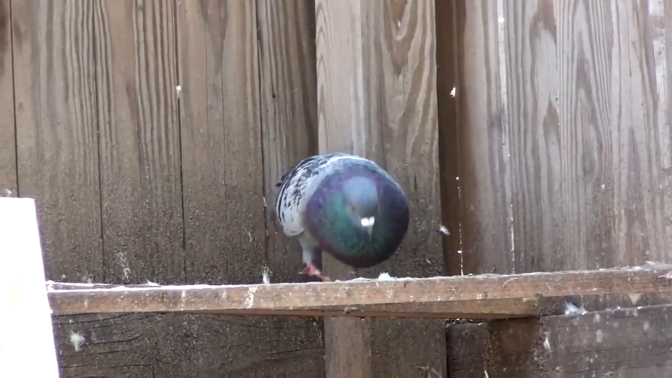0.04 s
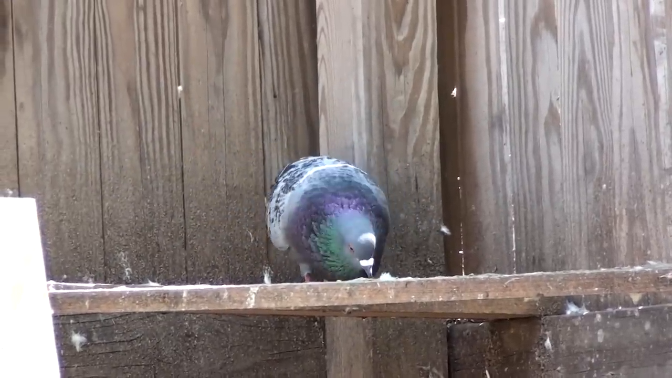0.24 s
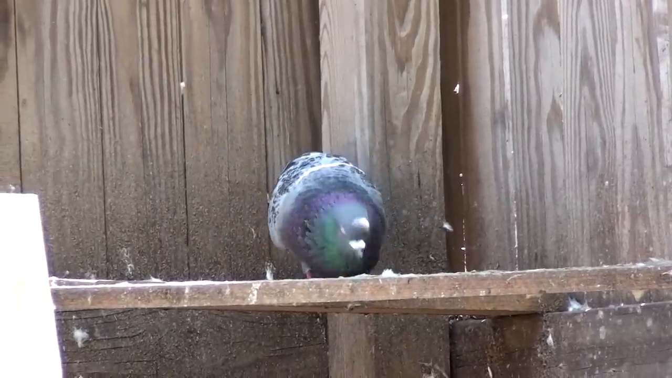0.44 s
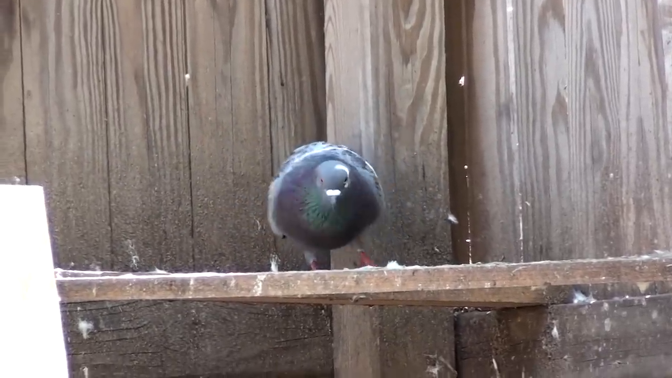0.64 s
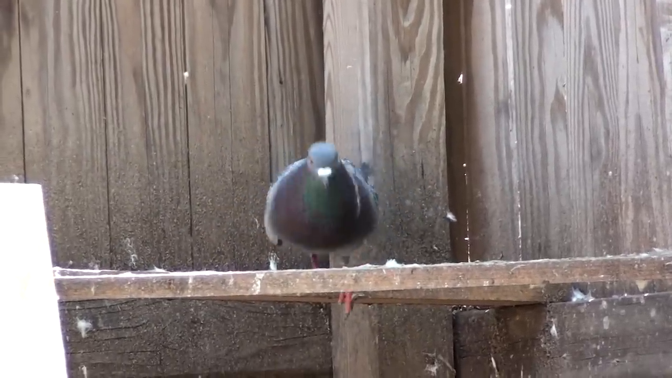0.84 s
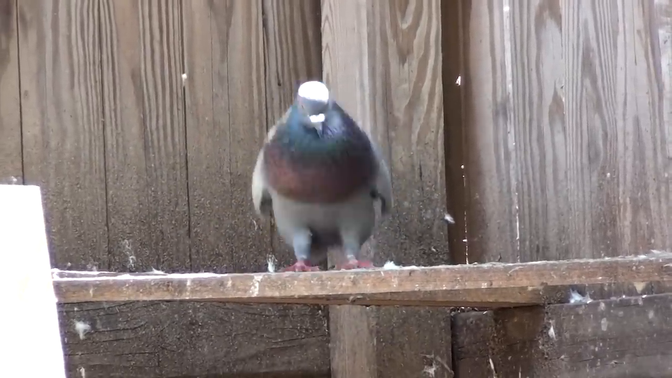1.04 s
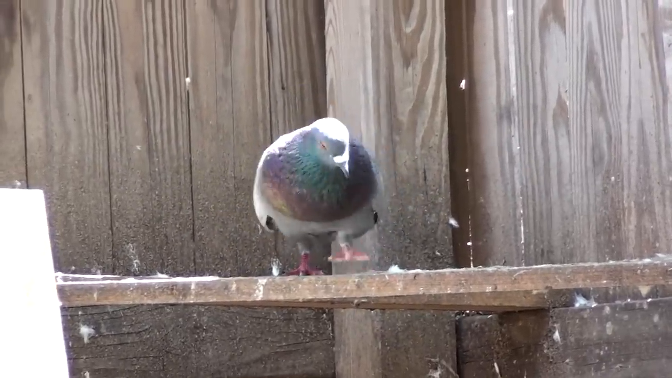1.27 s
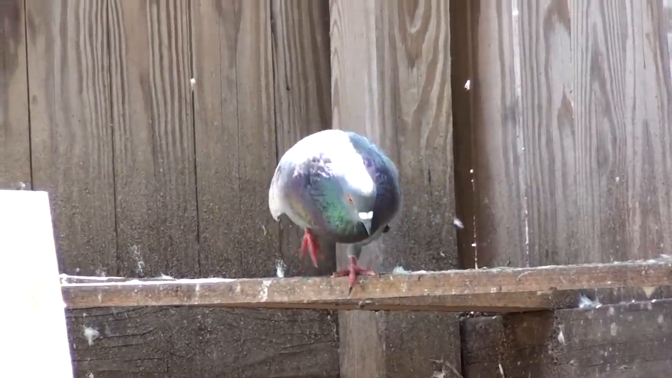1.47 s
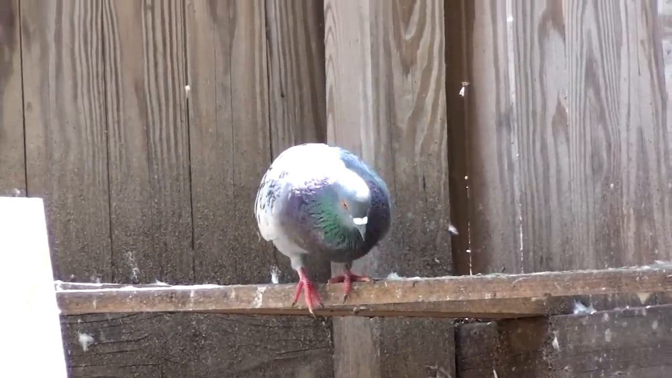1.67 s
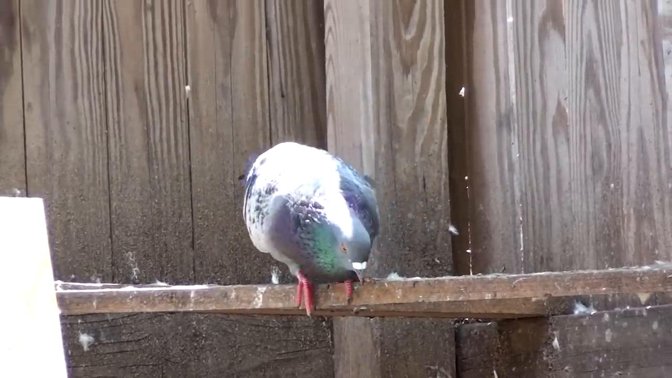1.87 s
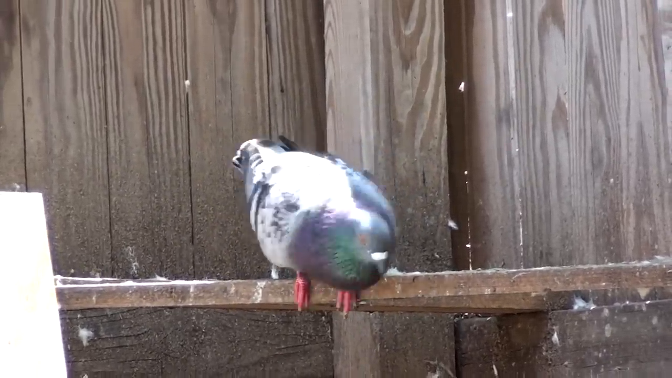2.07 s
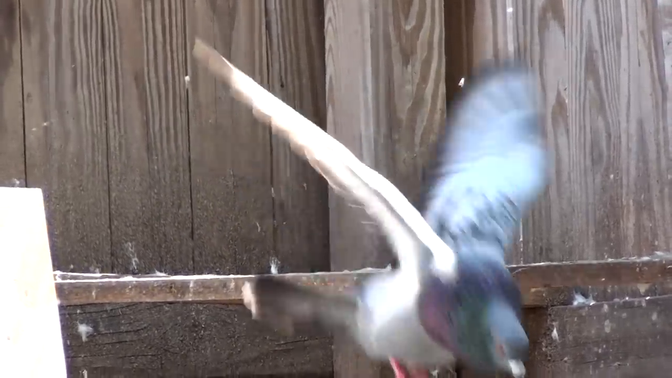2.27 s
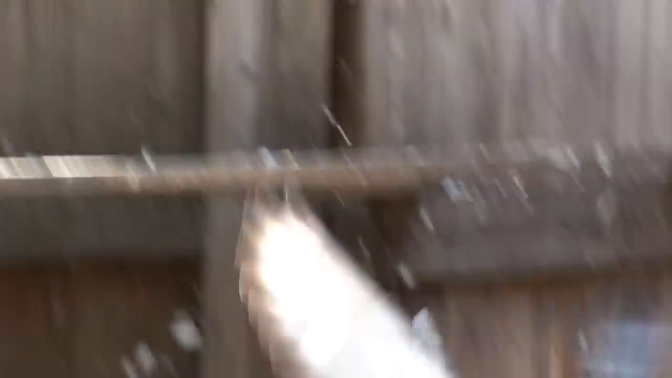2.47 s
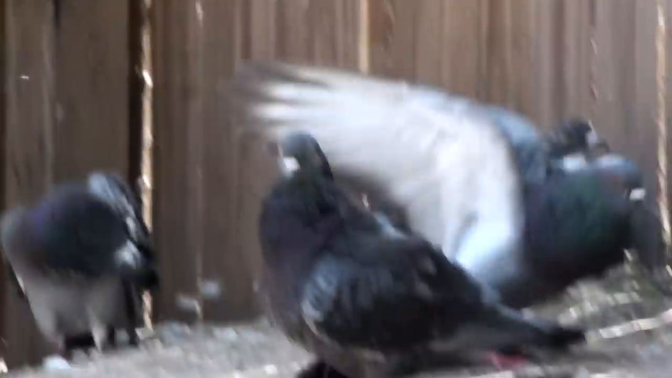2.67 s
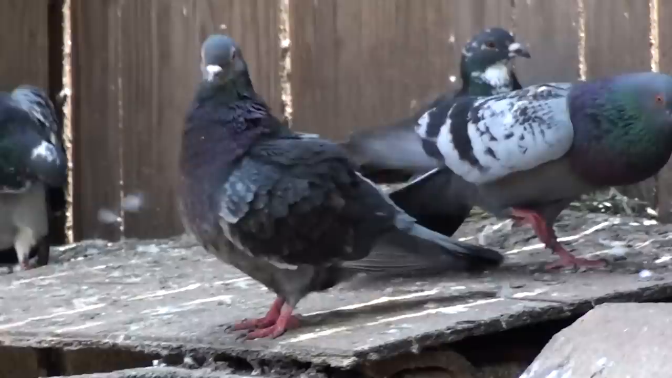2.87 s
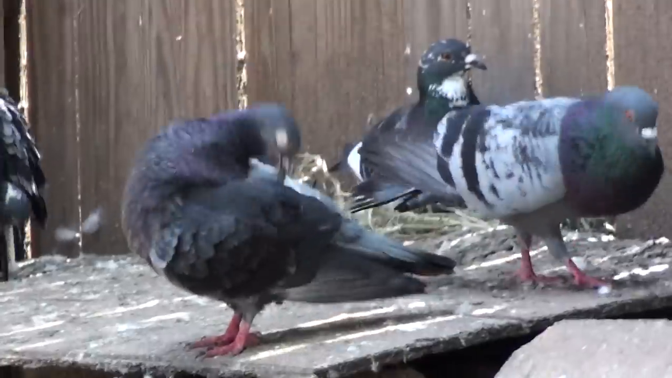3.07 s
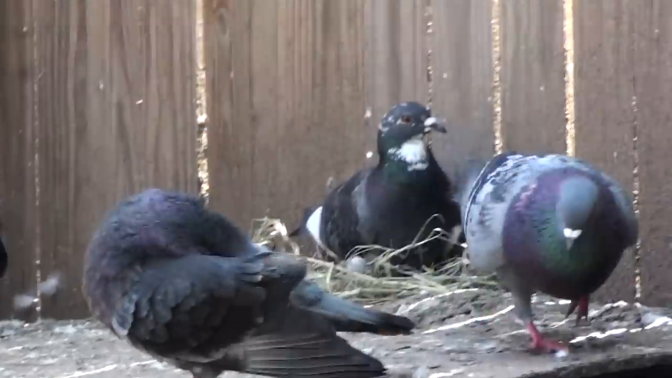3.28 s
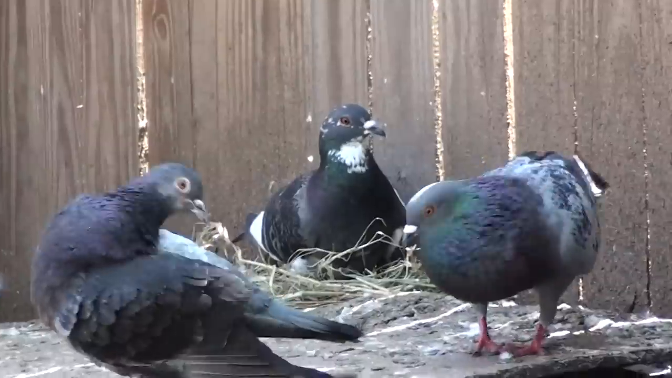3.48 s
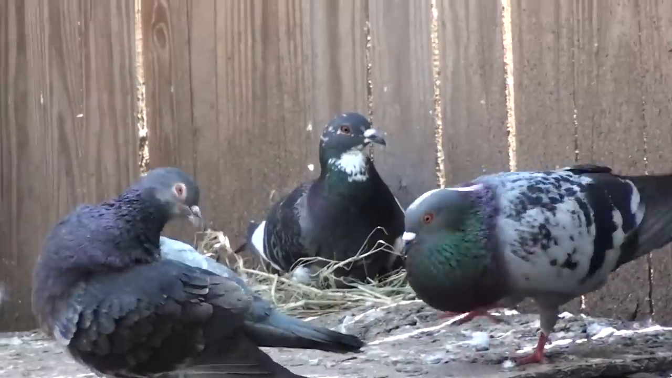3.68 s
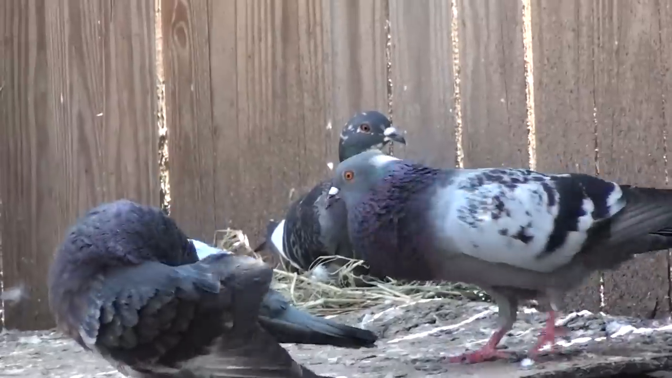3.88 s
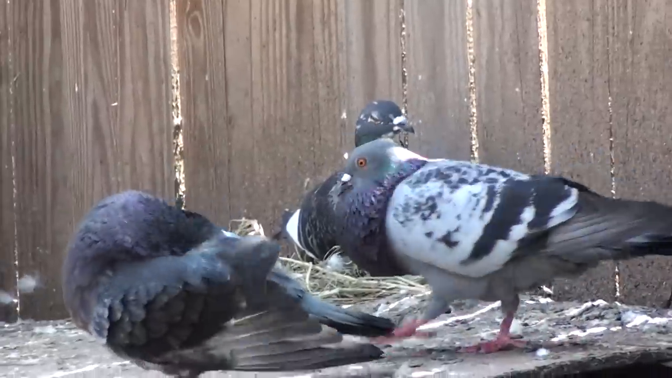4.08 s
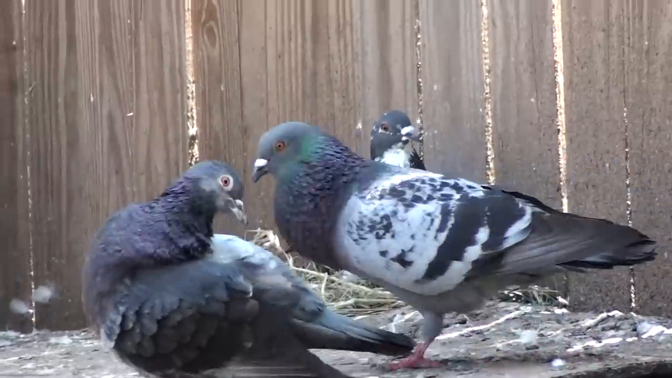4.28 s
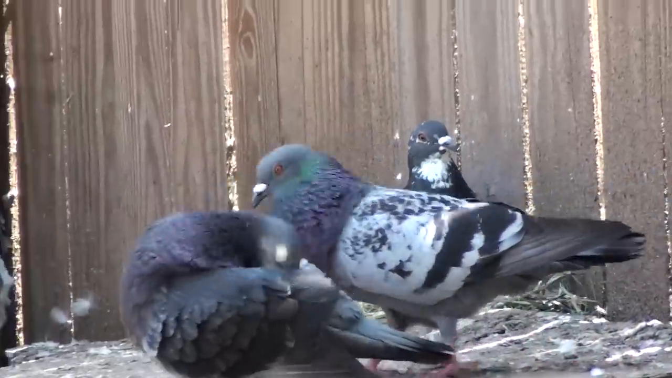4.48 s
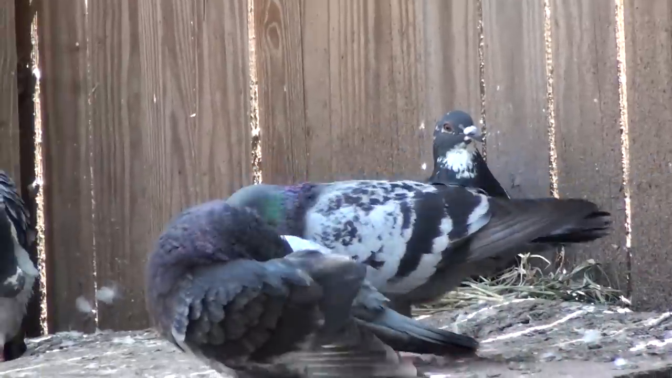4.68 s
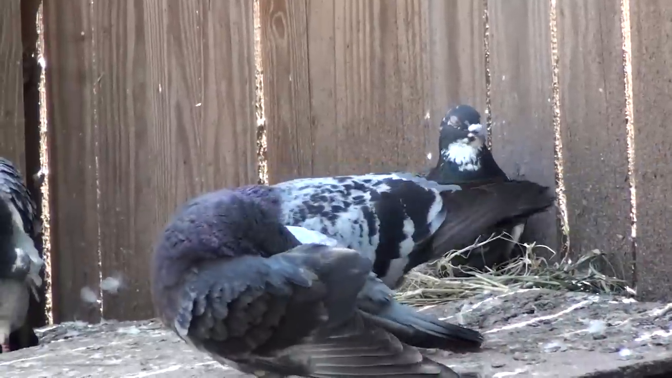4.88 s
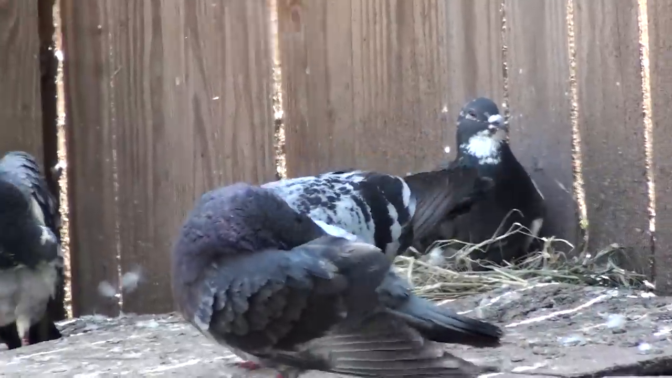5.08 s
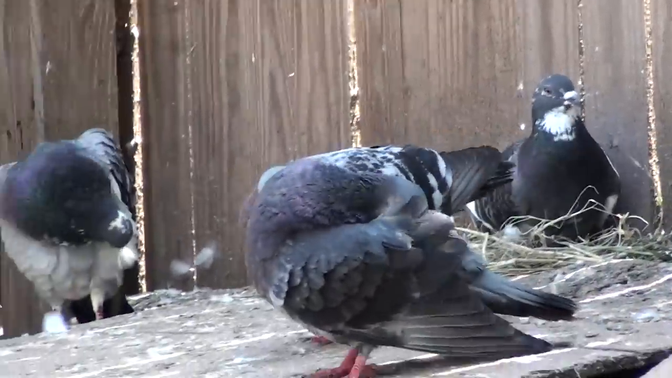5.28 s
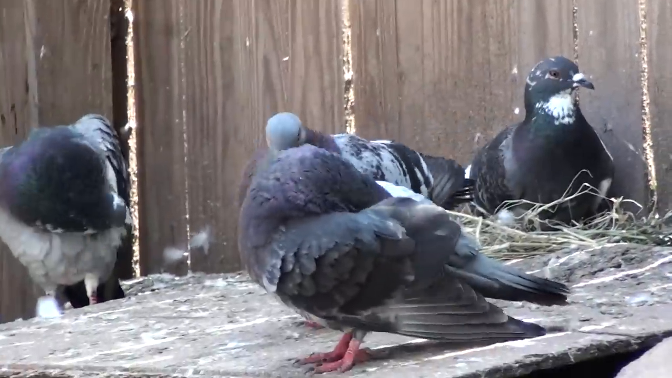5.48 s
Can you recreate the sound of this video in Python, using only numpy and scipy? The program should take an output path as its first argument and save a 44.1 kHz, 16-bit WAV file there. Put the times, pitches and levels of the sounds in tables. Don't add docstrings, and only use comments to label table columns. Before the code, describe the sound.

Two long hollow coos from one pigeon open the scene, each closing in a little gulp, with other birds murmuring behind. A tiny claw click and dry feather rustle lead to two quick wing claps. Then the cooing turns broken, lower and quieter, with several throats gurgling together. Handheld stereo pickup in a small wooden enclosure outdoors, with low yard rumble, soft hiss and thin motor whine.

```python
import sys
import numpy as np
from scipy import signal
from scipy.fft import rfft, irfft
from scipy.io import wavfile
from scipy.ndimage import uniform_filter1d

SR = 44100
rng = np.random.default_rng(int(sys.argv[2]) if len(sys.argv) > 2 else 0)


def voltage_ratio(decibels):
    exponent = np.asarray(decibels, float) / 20
    return 10 ** exponent


def put_to_file(sound):
    columns = np.atleast_2d(sound).T
    safe = np.clip(columns, -1, 1)
    whole_steps = np.round(safe * 32767)
    wavfile.write(sys.argv[1], SR, whole_steps.astype(np.int16))


N = 243873
T = np.arange(N) / SR


def walk(rate):
    hold = int(SR / rate)
    steps = np.repeat(rng.standard_normal(N // hold + 1), hold)
    return np.sqrt(2) * uniform_filter1d(uniform_filter1d(steps, hold), hold)[:N]


def hump(t, middle, length):
    return np.cos(np.pi * np.clip((t - middle) / length, -.5, .5)) ** 2


def swells(table):
    return sum(change * hump(T, middle, length) for middle, change, length in table)


def band(x, hz, width_hz):
    peak = signal.iirpeak(hz, max(hz / width_hz, .3), SR)
    return signal.lfilter(*peak, signal.lfilter(*peak, x))


# f/Hz, density level/dB per Hz
YARD = [(15, -36), (25, -8), (110, 3), (199, -4.5), (268, -8.5), (314, -8), (370, -11.5), (554, -13),
        (600, -12.5), (668, -14), (725, -13.5), (1210, -18.5), (3750, -29.5), (11900, -37), (15600, -38.5)]
# f/Hz, side minus mid level/dB
YARD_SIDE = [(25, -6.5), (60, -11), (125, -15), (250, -17), (400, -12), (700, -6), (1300, -2.5), (2400, -3),
             (4400, -3.5), (8000, -6.5), (11000, -8)]
# middle t/s, level/dB, length/s
RUMBLE = [(.01, -5, 0.31), (.3, -3.5, 0.38), (.58, 4, 0.05), (1.5, 2.5, 0.18), (3.73, -5, .06),
          (5.11, -3, .08), (4.52, 0.5, 0.093), (1.99, 3.5, 0.33), (2.58, -5.5, 0.13), (3.29, 3, 0.1),
          (3.325, -8, 0.04), (3.42, 5, 0.059), (3.47, -9, 0.08), (3.75, -1, 0.08), (4.34, -5, 0.1),
          (4.45, 3.5, .15), (5.45, 1.5, .1), (4.65, 1.5, 0.85), (5.11, 3, 0.21), (5.35, -2, 0.16),
          (5.52, -6, 0.11)]
# middle t/s, level/dB, length/s
PASSES = [
    (0.81, 1.5, 0.44),
    (1.96, 0.5, 1),
    (2.64, 2.5, 0.48),
    (3.57, 1, 0.24),
    (1.43, -2, 0.61),
    (1.02, -0.5, .3),
]
PASS_BASS = 0.28


def yard(level_db=-50, flicker_db=1.15, rumble_hz=170, hiss_hz=3000):
    log_hz = np.log(np.maximum(np.fft.rfftfreq(N, 1 / SR), 1))
    yard_hz, yard_db = np.transpose(YARD)
    side_hz, side_db = np.transpose(YARD_SIDE)
    mid = rfft(rng.standard_normal(N)) * voltage_ratio(np.interp(log_hz, np.log(yard_hz), yard_db, left=-90))
    random_phase = np.exp(2j * np.pi * rng.random(len(log_hz)))
    side = np.abs(mid) * random_phase * voltage_ratio(np.interp(log_hz, np.log(side_hz), side_db))
    air_db = swells(PASSES)
    rumble_db = swells(RUMBLE) + PASS_BASS * air_db
    out, step = 0, np.log(2) / 2
    for centre in np.arange(np.log(16), np.log(SR / 2), step):
        share = np.clip(1 - np.abs(log_hz - centre) / step, 0, 1)
        hz = np.exp(centre)
        bass = 1 / (1 + (hz / rumble_hz) ** 4)
        db = bass * (rumble_db - rumble_db.mean())
        db += flicker_db * walk(8) / (1 + hz / hiss_hz)
        db += (1 - bass) / (1 + (hz / hiss_hz) ** 2) * (air_db - air_db.mean())
        out = out + voltage_ratio(db) * irfft(share * np.array([mid + side, mid - side]), N)
    return out * voltage_ratio(level_db) / out.mean(axis=0).std()


# f/Hz, level/dB rms
WHINE = [
    (841, -72),
    (2526, -82),
]


def whine(patchy_db=3.5):
    ports = np.array([[.55], [-.55]])
    out = 0
    for hz, db in WHINE:
        out = out + np.sqrt(2) * voltage_ratio(db + patchy_db * walk(12)) * np.sin(2 * np.pi * hz * T + ports)
    return out


# middle t/s, change/%, length/s
WAVERS = [(.13, -3, .03), (.165, 3, .04), (.21, -2, .03), (.26, 1.5, .06), (.36, -3, .06), (.45, -1, .06),
          (.59, -1, .03), (.63, 2.5, 0.061), (.69, 1.5, .03), (.73, -2, .025), (1.64, 6, .09),
          (1.84, 1.8, 0.076), (1.94, 1.5, .025), (1.98, -1.78, 0.073), (2.04, 1.5, 0.056),
          (2.13, -1.5, .07), (2.2, 3, .025), (3.19, 3, .04), (3.23, 4, .03), (3.25, -2, .025),
          (3.31, 5, 0.029), (3.37, 2, .025), (3.43, 2, .03), (3.87, -1.5, .03), (3.94, -1.5, .04),
          (4.02, -3.5, .06), (4.85, 3, .03), (4.89, -5, .03), (4.93, -2, .025)]
# pitch f/Hz, octave level/dB
OCTAVE = [(135, -49.5), (165, -46.5), (192, -45.5), (235, -50), (300, -53.5), (350, -69)]
# middle t/s, level/dB, length/s
CATCHES = [(.145, 3, .03), (0.172, -4, 0.03), (3.6, -1, 0.021), (1.7, 2, 0.036), (.282, -4.5, 0.061),
           (0.318, 0, 0.031), (.498, -2.5, 0.049), (0.66, -3, 0.011), (.635, 1, .04), (.74, -3, 0.019),
           (1.815, -3.5, 0.037), (1.85, 1.5, 0.034), (2.142, -4, 0.057), (2.184, -8, .018),
           (3.3, -5, 0.018), (3.365, 0.5, 0.021), (3.378, -3, .015), (3.455, -2, 0.025), (3.484, -4, .01),
           (.35, -2, .04), (.52, 1, .04), (.19, -2, .025), (1.74, -1, .025), (1.76, 1, .025),
           (3.21, 0, .025), (3.87, 2, .025), (4.77, 3, .03), (3.477, 0.5, 0.028), (3.564, 1.5, 0.013),
           (3.843, 5.5, 0.027), (4.015, -3, 0.036), (4.095, 0, .03), (4.128, -3, 0.018)]
OCTAVE_CATCH = 0.98
# middle t/s, level/dB, length/s
BREAKS = [(0.148, -5.5, 0.042), (.71, 1.5, .05), (2.12, -4, .05), (2.15, 5, .04), (3.94, -1, 0.053),
          (.176, -8, 0.019), (0.079, -8, .03), (1.545, -8, 0.033), (1.565, 3, .04), (1.595, -6, 0.019),
          (1.645, -9, .035), (1.7, -3, .06), (1.97, -2, .08), (2.05, 2, .06), (3.83, 8, .04),
          (3.59, 3, .04), (5.455, 9, .04), (5.49, -8, .04), (4.5, 0.5, .06), (4.56, 1, 0.054),
          (.77, -8, .04), (4.88, -6, .05), (.115, 1, 0.051), (.505, -5, .03), (.632, -14, 0.034),
          (.74, -4, 0.063), (2.18, 0, 0.021), (3.12, -3, 0.057), (3.292, -15, 0.03), (3.32, 6.5, 0.06),
          (3.365, 2, .03), (1.8, -1, .05), (.35, -2, .05), (4.82, 1, .05), (3.085, -7, .06),
          (3.17, 3.5, .05), (5.51, -4, .03), (3.39, -8, .025), (4.12, -8, 0.14), (4.785, -6, .04),
          (4.84, 4.5, 0.051), (4.67, 0.5, 0.09)]
# from t/s, to t/s, level/dB
DOUBLING = [
    (0.223, 0.395, -50.5),
    (0.476, 0.598, -53),
    (0.602, .665, -50.5),
    (1.724, 1.91, -50),
]


def coo(track, lead, shimmer_db, octave_gain_db, wobble=0.006, fade_s=0.018):
    s, hz, effort_db = np.transpose(track)
    hz = np.interp(T, s, hz) * (1 + swells(WAVERS) / 100)
    catch_db = swells(CATCHES)
    octave_db = np.interp(hz, *np.transpose(OCTAVE)) + octave_gain_db + (0.75 + shimmer_db) * walk(40)
    octave_db += OCTAVE_CATCH * catch_db + swells(BREAKS)
    phase = 2 * np.pi * np.cumsum(hz * (1 + wobble * walk(60))) / SR
    gate = np.clip(np.minimum(T - s[0] + fade_s, s[-1] + fade_s - T) / fade_s, 0, 1)
    ports = np.array([[lead], [-lead]]) / 2
    first_db = np.interp(T, s, effort_db) + shimmer_db * walk(60) + catch_db
    half = sum(voltage_ratio(db) * hump(T, (a + b) / 2, b - a) ** 0.16 for a, b, db in DOUBLING)
    tone = voltage_ratio(first_db) * np.sin(phase + ports)
    tone += voltage_ratio(octave_db) * np.sin(2 * phase + 1 + 0.93 * ports)
    tone += voltage_ratio(octave_db - 16.5 - 0.14 * (hz - 178)) * np.sin(3 * phase + 1.2 * ports)
    tone += half * voltage_ratio(1.5 * walk(40)) * np.sin(3 * phase / 2 + .3 * walk(40) + ports)
    return np.sqrt(2) * gate * tone


# t/s, pitch f/Hz, effort level/dB
ARCHED = [
    [(.088, 176.8, -56), (.118, 191.3, -52), (.2, 252.1, -39), (.282, 284, -34.5), (.37, 289.3, -32),
     (.5, 316, -31.5), (.7, 303.7, -31.5), (.728, 269.8, -32.5), (.765, 223, -43)],
    [(1.555, 160.4, -76), (1.625, 197.3, -45.5), (1.666, 234.8, -50), (1.724, 248.8, -38.5),
     (1.893, 298.5, -34.5), (2.005, 302, -31), (2.14, 292.3, -31.5), (2.19, 249.7, -35.5),
     (2.205, 234, -40.5)],
]
# t/s, pitch f/Hz, effort level/dB
LANDED = [
    [(3.07, 126.3, -72), (3.156, 191.8, -60), (3.184, 203.9, -47.5), (3.274, 225.5, -48.5),
     (3.388, 258, -36), (3.48, 252, -37), (3.553, 258, -36), (3.575, 245.3, -42.5), (3.6, 214, -50)],
    [(4.63, 140, -73), (4.69, 168.8, -75), (4.745, 190.4, -59), (4.775, 208.3, -49), (4.83, 216.7, -47),
     (4.88, 224.8, -50), (4.93, 216.3, -46), (4.96, 219, -52)],
]
# t/s, pitch f/Hz, effort level/dB
FALLING = [
    [(3.822, 340, -52), (3.834, 320, -46), (3.85, 302, -42.5), (3.925, 283.3, -43.5), (4.081, 307.8, -45),
     (4.112, 300, -45.5), (4.13, 282, -52), (4.15, 266, -56.5)],
    [(5.445, 350, -39.5), (5.459, 345, -41), (5.485, 322, -42.5), (5.505, 313, -37.5), (5.53, 300, -46)],
]
# t/s, pitch f/Hz, effort level/dB
FAR = [
    [(4.47, 233.3, -88), (4.5, 234.6, -89), (4.548, 222.5, -90), (4.58, 241, -90), (4.6, 228, -95)],
    [(5.17, 294.6, -62), (5.27, 296, -58.5), (5.42, 297, -55.5)],
]
# left port leads phase/rad, shimmer/dB, octave gain/dB
VOICES = [
    (0.61, 1, 1),
    (0.8, .5, -1.5),
    (0.12, 1.2, -2),
    (-0.0023, 1.5, -3),
    (-0.11, -0.2, -3),
    (-.1, 0.5, 0.5),
    (-0.028, 1, -5),
    (-.052, 0.5, -28),
]


def coos():
    tracks = ARCHED + LANDED + FALLING + FAR
    return sum(coo(track, *voice) for track, voice in zip(tracks, VOICES))


# t/s, peak level/dB, centre f/Hz, ring/s, left minus right level/dB
TICKS = [(0.129, -49, 8000, 0.0015, -2), (0.403, -46, 5300, 0.0018, -5), (0.733, -49, 9800, 0.0015, 1),
         (0.835, -50, 4800, 0.004, -3), (0.848, -47, 8120, 0.002, 2), (1.1098, -50, 6280, 0.0048, 0.0),
         (1.9287, -46, 11000, 0.00037, -1), (1.9428, -46, 8000, 0.0015, -0.5),
         (2.793, -45.5, 11500, 0.0016, 14), (2.8538, -56, 5680, 0.0015, 0),
         (3.3861, -58, 11700, 0.0015, -1.0), (3.623, -55, 5710, 0.0015, 2),
         (4.1464, -54, 7810, 0.0015, -0.5), (4.7889, -51, 8800, 0.0015, -0.5)]
# t/s, peak level/dB, centre f/Hz, ring/s, left minus right level/dB
CLAP = [
    (2.5107, -37, 2000, .003, 0),
    (2.5108, -39, 9000, .003, 0),
]


def ticks(width=1.1):
    out, t = np.zeros((2, N + SR)), np.arange(SR // 20) / SR
    for s, db, hz, ring_s, pan_db in TICKS + CLAP:
        burst = rng.standard_normal(len(t)) * np.exp(-t / max(ring_s, .0002))
        burst = band(burst, hz, width * hz)
        burst *= voltage_ratio(db) / np.abs(burst).max()
        start = int(s * SR)
        out[:, start:start + len(t)] += np.outer(voltage_ratio(np.array([pan_db, -pan_db]) / 2), burst)
    return np.array([out[0, :N], np.roll(out[1], 1)[:N]])


def grains(table, grain_db, wide, rate, edge, wide_hz):
    out = np.zeros((2, N))
    for middle, length, db, hz, width_hz in table:
        at = np.flatnonzero(np.abs(T - middle) < length / 2)
        mid, side = band(rng.standard_normal((2, SR)), hz, 1.3 * width_hz)[:, -len(at):]
        spread = wide * min(hz / wide_hz, 1) * np.outer([1, -1], side)
        out[:, at] += voltage_ratio(db) / mid.std() * hump(T[at], middle, length) ** edge * (mid + spread)
    return out * voltage_ratio(grain_db * walk(rate))


# middle t/s, length/s, level/dB rms, centre f/Hz, width f/Hz
MURMUR = [
    (.45, 0.62, -56.5, 417, 200),
    (1.9, 0.63, -60.5, 417, 202),
    (3.4, 0.84, -59, 402, 250),
    (4.0, 0.66, -61, 417, 250),
    (4.5, .3, -59.5, 457, 200),
    (4.9, 0.54, -55, 376, 298),
    (5.2, 0.41, -65, 448, 300),
]


def murmur():
    return grains(MURMUR, grain_db=-0.5, wide=0.3, rate=38, edge=0.21, wide_hz=300)


# middle t/s, peak level/dB, first f/Hz, length/s
PLUNGES = [(.617, -40, 120, .06), (3.534, -34.5, 452, .02), (4.755, -43, 440, .03), (.648, -41, 396, .017),
           (.652, -50, 640, .014), (.808, -45, 330, .02), (3.443, -35, 381, 0.027),
           (3.549, -35.5, 410, 0.022), (3.801, -36.5, 513, 0.032), (3.826, -34.5, 403, .026),
           (4.143, -44.5, 522, 0.044), (4.162, -39, 515, 0.04), (4.975, -39, 417, 0.04),
           (5.01, -44.5, 283, 0.032), (5.439, -32, 536, 0.04)]
# middle t/s, peak level/dB, first f/Hz, length/s
GURGLES = [(.752, -49, 512, 0.033), (3.368, -42.5, 300, 0.0377), (3.432, -42.5, 484, 0.021),
           (4.736, -37, 477, 0.034), (4.9, -43, 490, 0.036), (3.37, -45, 522, .022), (.775, -46, 230, .03),
           (3.51, -55.5, 836, .06), (3.585, -47, 500, 0.031), (3.606, -44, 400, .014),
           (4.47, -54, 470, .05), (4.53, -52, 463, .05), (4.575, -51, 480, 0.038), (4.986, -35, 462, 0.041),
           (5.045, -44.5, 310, .04), (5.119, -38.5, 468, 0.049), (5.12, -37, 338, 0.03),
           (5.17, -52, 333, 0.035)]
# middle t/s, peak level/dB, first f/Hz, length/s
LIFTS = [(3.09, -50, 316, 0.05), (3.11, -67, 5900, 0.045), (4.05, -54, 440, .054), (4.195, -50, 426, 0.07),
         (4.215, -52, 435, .06), (4.405, -53, 455, .06), (4.785, -50, 500, .025), (4.015, -56, 445, .04),
         (4.24, -46.5, 442.5, .055), (4.6, -56, 580, 0.076), (4.72, -52, 518, .08),
         (4.795, -53.5, 670, .05), (4.941, -38, 456, 0.043), (5.038, -43, 486, 0.026),
         (5.148, -44, 475, .02), (5.172, -50, 520, 0.026)]
PLUNGE_FALL, GURGLE_FALL, LIFT_RISE = 0.25, 0.068, 0.031
# middle t/s, pitch f/Hz, octave level/dB, half line level/dB
GULPS = [
    (.79, 211.4, -34.5, -40.5),
    (2.232, 208.8, -34.5, -41.5),
    (3.62, 208, -35, -50),
]
GULP_S, GULP_FIRST_DB, GULP_FALL = .037, -46.5, 0.11


def throat_notes():
    rows = []
    for table, fall in [(PLUNGES, PLUNGE_FALL), (GURGLES, GURGLE_FALL), (LIFTS, -LIFT_RISE)]:
        for s, db, hz, length in table:
            rows.append((s, db, hz, hz * (1 - fall), length))
    for s, hz, octave_db, half_db in GULPS:
        for multiple, db in [(1, GULP_FIRST_DB), (3 / 2, half_db), (2, octave_db)]:
            rows.append((s, db, multiple * hz, multiple * hz * (1 - GULP_FALL), GULP_S))
    return rows


def gurgles(rough_db=1.0, wobble=.015):
    out, rough, shake = np.zeros(N), voltage_ratio(rough_db * walk(180)), 1 + wobble * walk(150)
    for middle, db, first_hz, last_hz, length in throat_notes():
        at = np.flatnonzero(np.abs(T - middle) < length / 2)
        hz = np.linspace(first_hz, last_hz, len(at))
        if first_hz < 1000:
            hz = hz * shake[at]
        out[at] += voltage_ratio(db) * hump(T[at], middle, length) * np.sin(2 * np.pi * np.cumsum(hz) / SR)
    return out * rough


# middle t/s, length/s, level/dB rms, centre f/Hz,
# width f/Hz
RUSTLES = [(.742, 0.033, -66, 9000, 6000), (.95, 0.22, -69, 8950, 8040), (1.41, 0.054, -69, 9000, 7000),
           (1.58, 0.1, -69.5, 10000, 6000), (1.895, 0.036, -65, 11500, 1000), (1.93, 0.13, -65, 8900, 8000),
           (2.55, 0.61, -67.5, 10000, 9000), (3.235, 0.084, -68, 10000, 6000),
           (3.4, 0.05, -68, 10500, 5000), (3.47, .03, -69, 10500, 5000), (4.1, 0.038, -73, 11000, 4020),
           (4.175, 0.06, -66.5, 10000, 6000), (3.66, .3, -62, 1260, 199), (3.62, 0.02, -70, 8000, 8000),
           (5.15, 0.041, -64, 1980, 1500)]


def rustles():
    return grains(RUSTLES, grain_db=2.5, wide=0.43, rate=250, edge=0.38, wide_hz=1000)


# t/s, peak level/dB, centre f/Hz
SNAPS = [(1.9287, -32, 7000), (1.9292, -40, 4500), (1.9305, -48, 9500), (1.9318, -45, 6000),
         (1.9327, -47, 6000), (1.9347, -49, 8000), (1.9365, -49, 5000), (2.5055, -44, 3500),
         (2.5058, -45, 12000), (2.5066, -47, 7000), (2.5078, -46, 4000), (2.5090, -48, 9000),
         (2.5106, -29, 6000), (2.5113, -31, 2500), (2.5115, -32, 8000), (2.5124, -33, 6000),
         (2.5126, -37, 11000), (2.5131, -38, 2200), (2.5141, -34, 4500), (2.5157, -41, 12000),
         (2.5173, -38, 12000), (2.5178, -39, 1500), (2.5203, -40, 4500), (2.5221, -40, 2500),
         (2.5250, -43, 3000), (2.6635, -44, 3200), (2.6641, -45, 4500), (2.6666, -37, 600),
         (2.6710, -41, 450), (2.6730, -41, 1200), (2.6748, -40, 350), (2.6770, -39, 2500),
         (2.6788, -38, 900), (2.6797, -31.5, 600), (2.6825, -41, 1500), (2.6835, -39, 500),
         (2.6850, -38, 1000), (2.6868, -39, 450), (2.6912, -43, 1300), (2.6955, -44, 1800),
         (2.6997, -44, 2500), (.8335, -50, 5000), (.839, -50, 3500), (.847, -51, 7000), (2.7918, -49, 4600),
         (3.228, -50, 11000), (4.172, -51, 10000), (.4032, -47, 5200)]


def snaps(width=1.2):
    out, click = np.zeros(N), 1. * (np.arange(SR // 50) == 0)
    for k, (s, db, hz) in enumerate(SNAPS):
        ring = band(click, hz, width * hz)
        sign = (-1) ** (k + 1)
        start = int(s * SR)
        out[start:start + len(ring)] += sign * voltage_ratio(db) * ring / np.abs(ring).max()
    return np.array([out, np.roll(out, 1)])


# middle t/s, length/s, level/dB rms, centre f/Hz, width f/Hz
WINGS = [(2.43, .07, -66, 1500, 1500), (2.521, .022, -52, 2200, 3000), (2.522, .036, -57.5, 8500, 10000),
         (2.522, .024, -51, 1000, 1000), (2.517, .016, -51, 500, 500), (2.519, .028, -55, 13000, 4000),
         (2.677, .036, -54, 5500, 4500), (2.679, .03, -52, 300, 250), (2.683, .045, -52, 1600, 1000),
         (2.692, .06, -59, 4000, 7000), (2.684, .05, -60, 11000, 7000), (2.798, .02, -66, 10500, 7000),
         (2.86, .04, -66, 4000, 5000), (3.15, .05, -58, 750, 600)]


def wings():
    return grains(WINGS, grain_db=1.6, wide=.4, rate=900, edge=.4, wide_hz=2000)


def capsule(x, corner_hz=13300, shelf_db=-8):
    dull = signal.sosfiltfilt(signal.butter(6, corner_hz, fs=SR, output="sos"), x)
    return dull + voltage_ratio(shelf_db) * (x - dull)


def loft(x, db, t60_s):
    t = np.arange(SR // 3) / SR
    tail = rng.standard_normal((2, len(t))) * np.exp(-np.log(1000) * t / t60_s) * (t > .004)
    tail *= voltage_ratio(db) / np.sqrt((tail ** 2).sum(axis=1, keepdims=True))
    return x + signal.fftconvolve(x, tail, axes=1)[:, :N]


def scene():
    background = yard() + whine()
    voices = coos() + gurgles()
    moves = capsule(ticks() + rustles() + snaps() + wings())
    birds = loft(voices, db=-24, t60_s=.3) + loft(moves, db=-15, t60_s=.15)
    return birds + murmur() + background


def top_cut(x):
    return signal.sosfilt(signal.butter(12, 15770, fs=SR, output="sos"), x)


def record(dry, top_hz=15750, mono_hz=11900):
    left, right = dry * voltage_ratio(np.array([[-.2], [.2]]))
    mid = signal.sosfiltfilt(signal.ellip(8, .1, 50, top_hz, fs=SR, output="sos"), left + right) / 2
    side = signal.sosfiltfilt(signal.butter(8, mono_hz, fs=SR, output="sos"), left - right) / 2
    return top_cut(np.array([mid + side, mid - side]))


dry = scene()
out = record(dry)
put_to_file(out)
```